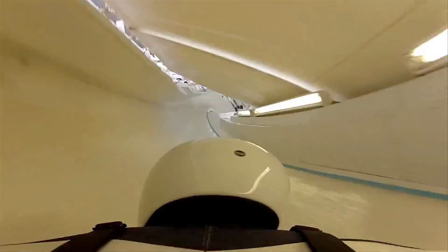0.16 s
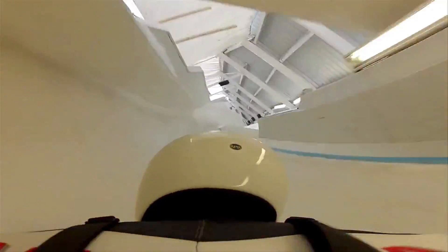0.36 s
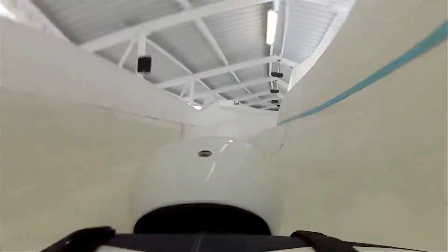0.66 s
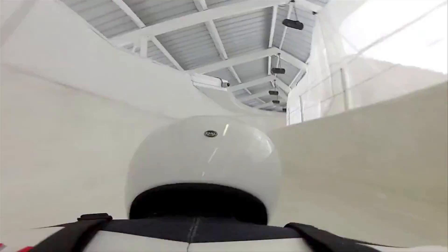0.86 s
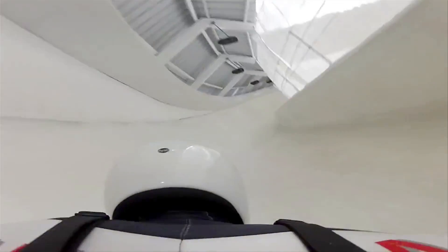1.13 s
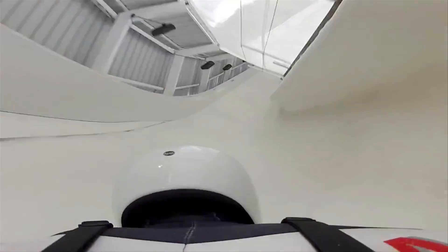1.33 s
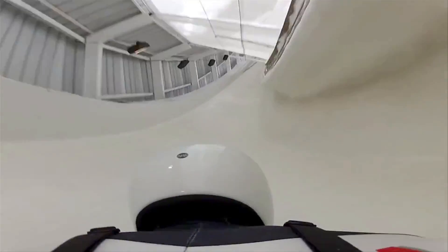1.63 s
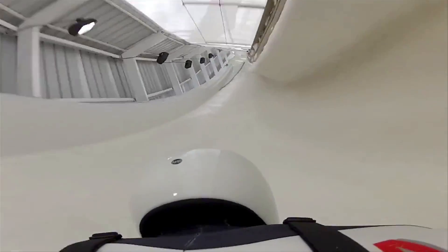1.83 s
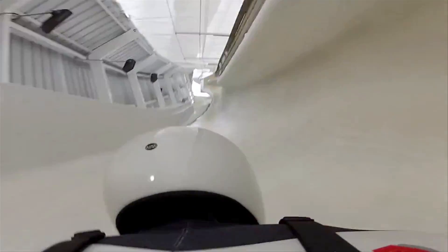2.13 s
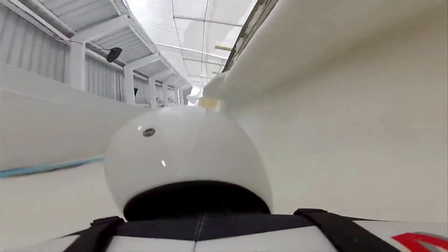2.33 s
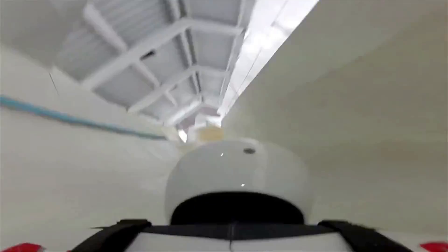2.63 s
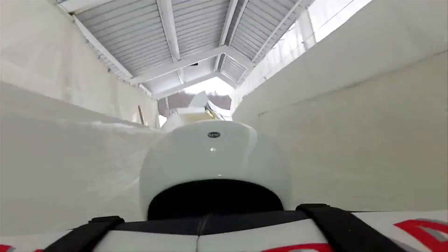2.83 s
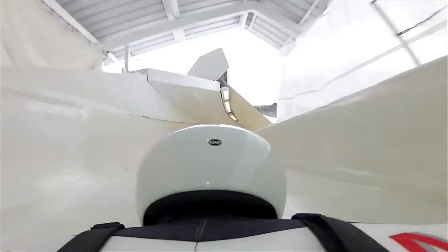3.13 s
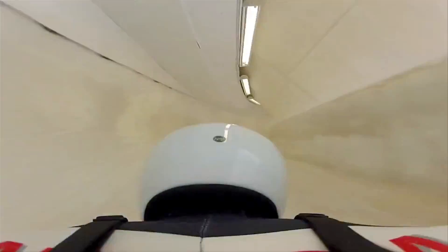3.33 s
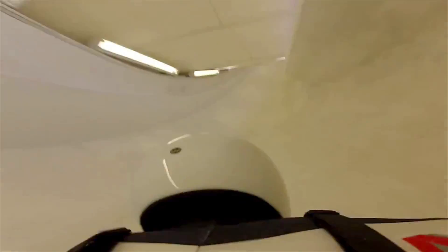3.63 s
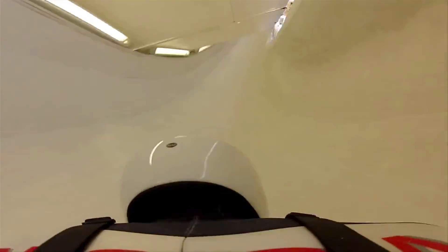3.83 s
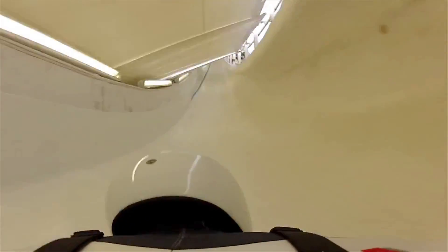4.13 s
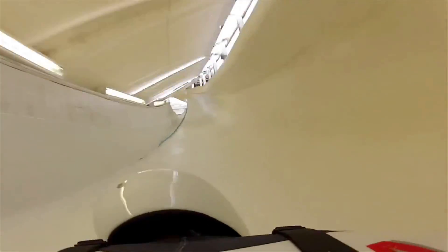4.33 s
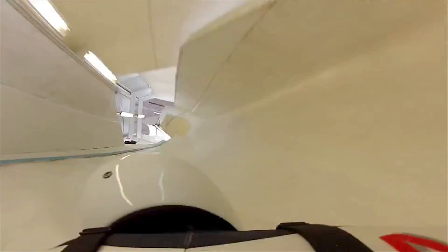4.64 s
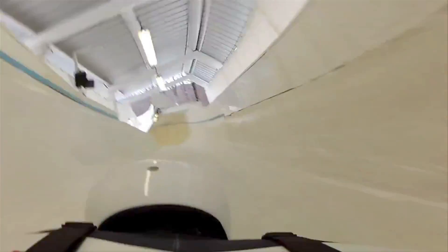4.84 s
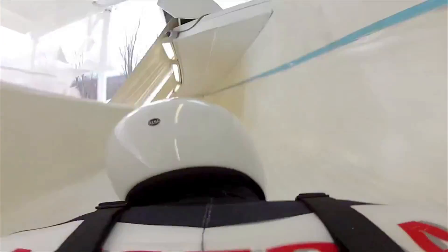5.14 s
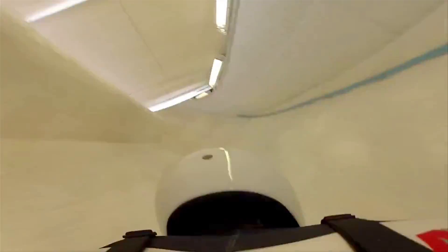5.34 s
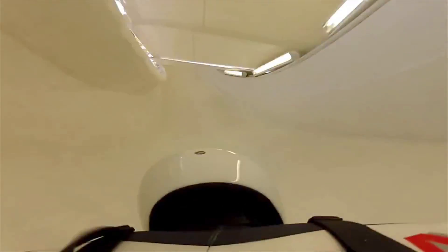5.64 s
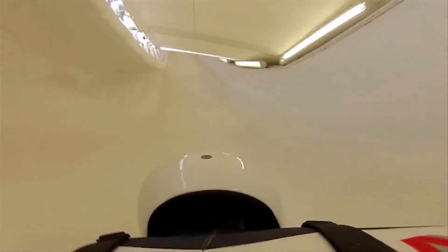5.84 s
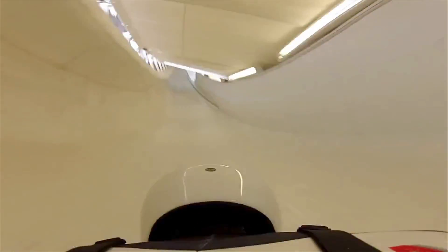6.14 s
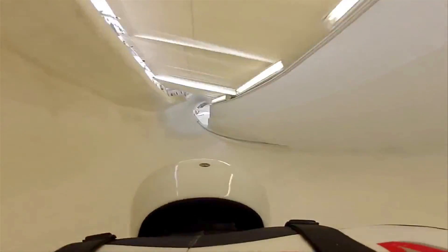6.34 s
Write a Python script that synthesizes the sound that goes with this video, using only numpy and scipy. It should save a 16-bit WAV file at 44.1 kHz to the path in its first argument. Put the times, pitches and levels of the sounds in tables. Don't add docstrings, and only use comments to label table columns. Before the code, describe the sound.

Continuous rough ice-scraping roar heard from a camera mounted on a speeding sled, with wind rumble, bumps and sharp clacks that briefly duck the sound.

```python
import sys
import numpy as np
from scipy import signal
from scipy.fft import rfft, irfft, next_fast_len
from scipy.io import wavfile
from scipy.ndimage import uniform_filter1d

SR = 44100
rng = np.random.default_rng(int(sys.argv[2]) if len(sys.argv) > 2 else 0)


def transcribe(signal):
    frames = np.atleast_2d(signal).T
    limited = np.clip(frames, -1, 1)
    pcm = np.round(limited * 32767).astype(np.int16)
    wavfile.write(sys.argv[1], SR, pcm)


def ratio_of_db(decibels):
    return 10 ** (np.asarray(decibels, float) / 20)


N = 286209


def rms_one(x):
    return x / np.sqrt(np.mean(x ** 2) + 1e-20)


def drift(rate_hz):
    r = np.exp(-2 * np.pi * rate_hz / SR)
    slow = signal.lfilter([1], [1, -2 * r, r * r], rng.standard_normal(N + SR))
    return rms_one(slow[SR:])


def evened(x, seconds):
    return x / np.sqrt(uniform_filter1d(x ** 2, int(seconds * SR)) + 1e-12)


def resonate(x, hz, width_hz):
    r = np.exp(-np.pi * width_hz / SR)
    poles = [1, -2 * r * np.cos(2 * np.pi * hz / SR), r * r]
    return signal.lfilter([(1 - r * r) / 2, 0, (r * r - 1) / 2], poles, x)


def body(x, modes, flicker_db, rate_hz):
    out = np.zeros(len(x))
    for k, (hz, width_hz, db) in enumerate(modes):
        gain = ratio_of_db(db + flicker_db * drift(rate_hz))
        out += (-1) ** k * gain * resonate(x, hz, width_hz)
    return out


# (frequency [Hz], width [Hz], level [dB])
FRAME_MODES = [
    (95.8, 26.3, -3),
    (125, 45.5, 2),
    (161.3, 80.3, -1),
    (211.4, 87, -7.5),
]


def frame_and_wind(drone_db, buffet_db):
    drone = evened(body(rng.standard_normal(N), FRAME_MODES, flicker_db=2.0, rate_hz=19.3), seconds=0.0415)
    eddies = signal.butter(2, [28, 95], "band", fs=SR, output="sos")
    buffet = evened(signal.sosfilt(eddies, rng.standard_normal(N)), seconds=0.053)
    rush = resonate(rng.standard_normal(N), 254, 140) * ratio_of_db(1.03 * drift(10.0))
    return ratio_of_db(drone_db) * drone + ratio_of_db(buffet_db) * buffet + ratio_of_db(-11.0) * rms_one(rush)


# (time of widest swing [s], peak level as heard [dB], frequency [Hz])
GUST_EVENTS = [(0.385, -12, 65.3), (0.505, -15, 59), (0.697, -14.5, 53), (0.18, -16, 44.5), (1.6, -13, 75),
               (2.083, -12, 63.4), (2.217, -17, 52), (2.322, -16, 52), (2.48, -12, 55), (2.697, -15, 60),
               (3.116, -13, 63), (3.467, -12.5, 62), (3.688, -14.5, 47), (3.946, -14, 50.4),
               (4.101, -16, 45), (4.526, -17, 52.3), (4.596, -17.5, 51.7), (4.765, -16, 55.3),
               (4.869, -15, 58), (5.004, -12, 58), (5.313, -9, 60.4), (5.524, -12, 49.5), (5.767, -15, 64),
               (5.929, -15, 45.8), (6.091, -14, 63), (6.163, -10, 49), (6.281, -15, 53)]
# (time of widest swing [s], peak level as heard [dB], frequency [Hz])
BUMP_EVENTS = [(0.379, -8.5, 149), (0.486, -5.5, 149), (1.564, -10.5, 125), (1.63, -7, 131),
               (4.58, -13.5, 121), (1.867, -12, 152), (2.104, -16, 136), (2.306, -14, 127),
               (2.355, -13.5, 120), (2.518, -9, 124), (2.703, -10, 107), (2.75, -7.5, 135),
               (2.938, -14.5, 142), (3.04, -10, 142), (3.074, -16, 135), (3.11, -11.5, 118),
               (3.224, -7.5, 139), (3.261, -11.5, 146), (3.288, -5.5, 127), (3.317, -11, 144),
               (3.452, -12.5, 141), (3.573, -13, 125), (4.044, -13, 140), (4.756, -10, 142),
               (4.869, -12, 133), (4.944, -12, 125), (5.002, -12.5, 159), (5.228, -12, 149),
               (5.32, -8.5, 136), (5.361, -9, 129)]


def swings(events, swing_cycles, drop_db):
    out = np.zeros(N + SR)
    half = SR // 20
    phases = rng.uniform(0, 2 * np.pi, len(events))
    for (s, db, hz), phase in zip(events, phases):
        cycles = np.arange(-half, half) / SR * hz
        spread = swing_cycles * ratio_of_db(0.37 * (db + 11))
        swing = np.exp(-(cycles / spread) ** 2) * np.sin(2 * np.pi * cycles + phase)
        at = round(s * SR)
        out[at - half:at + half] += ratio_of_db(db + drop_db[at]) * swing
    return out[:N]


# (frequency [Hz], level per Hz [dB])
TREBLE_SPECTRUM = [(2500, 1), (4000, -2), (4410, -5.5), (5440, -1), (6050, -15.5), (6600, -1.5), (7660, -9.5),
                   (8590, -0.5), (9050, -7.5), (9600, 4.5), (10500, -4), (11900, -17.5), (14400, 0.5),
                   (15500, -21)]


def shape_treble(x):
    hz, db = np.transpose(TREBLE_SPECTRUM)
    grid = np.linspace(0, SR / 2, 512)
    gain = ratio_of_db(np.interp(np.log(grid + 1), np.log(hz), db, left=-60, right=-80))
    return signal.oaconvolve(x, signal.firwin2(255, grid, gain, fs=SR), "same")


# (frequency [Hz], width [Hz], level [dB])
HOUSING_MODES = [
    (653, 95, -5.5),
    (1200, 190, 0.5),
    (1837, 467, 1),
    (2284, 404, 3),
    (2642, 203, -1.5),
    (3440, 210, -3),
]


def runners(tick_rate, tick_db, size_db, chatter_db, chip_rate, chip_db):
    chatter = ratio_of_db(chatter_db * (drift(40.0) + 0.63 * drift(12.0)))
    tick_sizes = ratio_of_db(tick_db + size_db * np.minimum(rng.exponential(1, N), 4))
    ticks = (rng.random(N) < tick_rate / SR) * tick_sizes
    burst = signal.lfilter([1], [1, -.97], ticks)
    drive = (chatter + burst) * rng.standard_normal(N)
    chip_hits = rng.random(N) < chip_rate * ratio_of_db(5 * drift(5.)) / SR
    chips = chip_hits * ratio_of_db(chip_db) * rng.standard_normal(N)
    taps = signal.lfilter([.5, .5], [1, -.3], chips)
    treble = shape_treble(drive)
    spray = signal.sosfilt(signal.butter(2, 7500, "high", fs=SR, output="sos"), treble)
    treble += (ratio_of_db(2.0 * drift(32.0) + 2.8 * drift(140.0)) - 1) * spray
    rattle = body(drive + taps, HOUSING_MODES, flicker_db=0.64, rate_hz=18.0)
    return rms_one(rattle) + ratio_of_db(-7.5) * rms_one(treble)


# (time [s], peak level as heard [dB], mode struck hardest [Hz], gain drop [dB])
JOLT_EVENTS = [(0.076, -6.5, 1830, 2), (0.383, -3.5, 1140, 1), (0.517, -9, 1890, 3.5),
               (0.564, -7.5, 1400, 4.5), (0.7, -6, 1700, 8), (0.77, -0.5, 1840, 16), (0.791, -14, 1270, 13),
               (0.977, -2, 1840, 7), (1.688, -11, 1220, 2.5), (1.883, -7, 2520, 3), (2.148, -4, 1280, 6),
               (2.709, 0.5, 1720, -3), (2.748, -3, 1800, 12.5), (3.127, -8.5, 2020, 4),
               (3.346, -6.5, 1180, 7), (3.508, -4, 1780, 9), (3.706, -1.5, 1270, 13.5),
               (4.289, -6, 2020, 1.5), (4.327, -5.5, 1800, 2.5), (4.675, -6.5, 1360, 4.5),
               (4.886, -9.5, 1190, 5.5), (4.947, -5.5, 1530, 8.5), (5.384, -6.5, 1820, 8.5),
               (5.518, -3, 1890, 8.5), (5.797, -1, 1840, 6), (5.82, -11, 1810, 6), (5.965, -8, 1790, 4),
               (6.188, -5.5, 1590, 9.5), (6.285, -6, 1930, 9), (6.45, -8, 2200, 6.5)]
# (time [s], peak level as heard [dB], mode struck hardest [Hz])
TAP_EVENTS = [(0.015, -12, 2130), (0.108, -8.5, 2250), (0.224, -11.5, 2120), (0.405, -14, 1900),
              (0.614, -4, 1920), (0.639, -14, 1930), (0.81, -18, 1170), (1.261, -7.5, 1190),
              (2.266, -15, 1280), (2.348, -6.5, 1850), (2.423, -6, 1740), (2.471, -13.5, 1170),
              (2.503, -11, 1880), (2.577, -11, 1890), (5.668, -11, 1800), (2.895, -12, 1740),
              (3.251, -9.5, 1260), (3.558, -9, 1200), (3.686, -17, 2350), (3.763, -11, 1290),
              (4.047, -7.5, 2170), (4.435, -10, 2660), (4.6, -5.5, 1130), (4.987, -10.5, 2100),
              (5.447, -10, 1240), (5.593, -7.5, 1310), (5.917, -9, 2300), (6.008, -13, 1950),
              (6.084, -8.5, 1910), (6.12, -10, 1280)]
# (time [s], peak level as heard [dB])
THUD_EVENTS = [(0.076, -13), (0.384, -25), (0.622, -14.5), (0.7, -26), (1.688, -20), (2.039, -11.5),
               (2.148, -15), (2.307, -13), (2.709, -16), (3.085, -12.5), (3.706, -15), (3.763, -18),
               (4.333, -16.5), (4.53, -17), (4.6, -16), (6.188, -12), (4.674, -15), (4.947, -17),
               (5.326, -14.5), (6.008, -19), (6.12, -14)]
# (time [s], peak level as heard [dB])
PING_EVENTS = [(0.108, -13), (0.224, -14), (0.384, -13), (0.977, -26), (1.261, -13), (1.688, -20),
               (1.884, -14), (2.423, -19), (2.471, -7), (2.577, -10.5), (3.346, -16), (3.686, -12),
               (4.327, -24), (5.518, -30), (5.593, -22), (6.45, -19)]


def knocks(drop_db):
    ring, rattle, crack = np.zeros((3, N))
    t = np.arange(SR // 50) / SR
    contact = (t / .002) ** 2 * np.exp(2 - 2 * t / 0.0017)
    thud = np.sin(2 * np.pi * 680 * t) * t / 0.0033 * np.exp(1 - t / 0.0025)
    ping = contact * (np.sin(2 * np.pi * 3697 * t) + ratio_of_db(-7.5) * np.sin(2 * np.pi * 8360 * t))
    blows = [row[:3] for row in JOLT_EVENTS + TAP_EVENTS]
    draws = rng.standard_normal((len(blows), len(t)))
    for (s, db, hz), draw in zip(blows, draws):
        start = round(s * SR)
        at = slice(start, start + len(t))
        size = ratio_of_db(db + drop_db[start + SR // 500])
        struck = 1.03 * contact * np.sin(2 * np.pi * hz * t)
        ring[at] += size * (struck + ratio_of_db(-22.5) * ping + ratio_of_db(-24) * thud)
        rattle[at] += 2.02 * size * contact * draw
        crack_db = -6.5 + 1 * np.log2(hz / HOUSING_MODES[2][0])
        crack[at] += size * contact * ratio_of_db(crack_db) * draw
    for events, shape in (THUD_EVENTS, thud), (PING_EVENTS, ping):
        for s, db in events:
            at = round(s * SR)
            ring[at:at + len(t)] += ratio_of_db(db + drop_db[at + SR // 500]) * shape
    dull = signal.butter(1, (300, 1800), "band", fs=SR, output="sos")
    punch = ratio_of_db(-11) * signal.sosfilt(dull, rattle)
    return ring + punch + body(rattle, HOUSING_MODES, flicker_db=-1.0, rate_hz=3) + shape_treble(crack)


def gain_drop_db():
    attack_s, release_s, start_drop_db = 0.0054, 0.16, 2
    t = np.arange(N) / SR
    drop = start_drop_db * np.exp(-t / release_s)
    for s, _, _, db in JOLT_EVENTS:
        since = t - s - .004
        drop = np.maximum(drop, db * np.exp(-np.abs(since) / release_s) * (since > 0))
    r = np.exp(-1 / (attack_s * SR))
    return signal.lfilter([1 - r], [1, -r], drop)


# (time [s], bite of the runners [dB], frame drone above the hiss [dB], wind buffet above the hiss [dB])
RIDE_COURSE = [(0.0, -2, -2.5, 1), (0.3, -3.5, 0.5, -0.5), (0.7, -1, 3, 5.5), (1.0, -0.5, 4.5, -1),
               (1.5, -1.6, -6, -4), (1.6, -2.2, 5.5, -1.5), (1.9, -0.3, 1, -2.5), (2.4, -1.5, 3.5, -4),
               (2.75, -2.5, 4, 4.5), (3.25, 1.5, 4, 3), (3.7, 0, 1.5, -3), (4.0, 0.5, -1, -2),
               (4.4, -1.7, -7.5, 2.5), (4.85, 0.5, -6, -3), (5.35, 0.5, 3.5, -1), (5.7, 0, 0, -2),
               (6.1, 0, -1, -1), (6.49, 2.5, -1, 3)]


def scene():
    s, *controls = np.transpose(RIDE_COURSE)
    bite_db, drone_db, buffet_db = (np.interp(np.arange(N) / SR, s, c) for c in controls)
    drop_db = gain_drop_db()
    ride = runners(tick_rate=41.0, tick_db=-3.5, size_db=4.0, chatter_db=0.0, chip_rate=150., chip_db=14.5)
    ride += ratio_of_db(-16 - 1.18 * drone_db) * resonate(ride, 2540, 430)
    skip_db = 0.16 * drop_db
    ride += frame_and_wind(drone_db - 2.5 - skip_db, buffet_db - 4.5 - skip_db)
    lows = swings(BUMP_EVENTS, 1.45, drop_db) + swings(GUST_EVENTS, 0.62, drop_db)
    return (ratio_of_db(-19.5 + bite_db) * ride + lows + knocks(drop_db))[None]


def limit(x):
    t = np.arange(N) / SR / 0.041
    over = np.maximum(20 * np.log10(np.abs(x) + 1e-9) + 4.5, 1e-3)
    drop = np.exp(np.maximum.accumulate(np.log(over) + t) - t)
    r = np.exp(-1 / (0.0047 * SR))
    return x * ratio_of_db(-signal.lfilter([1 - r], [1, -r], drop))


# (lower edge [Hz], upper edge [Hz], share of time kept [0-1])
WEAK_STRIPS = [(5800, 5900, .7), (5900, 6150, .04), (6150, 6260, .6), (10850, 11050, .7),
               (11050, 11220, .08), (11220, 11420, .3), (11420, 11780, .04), (11780, 11950, .45),
               (11950, 12060, .06), (12060, 12250, .55), (12250, 12550, .12), (12550, 12780, .45),
               (12780, 13000, .07), (13000, 13300, .85), (14750, 14950, .7), (14950, 15350, .04),
               (15350, 15800, .01)]


def starve(x):
    size = next_fast_len(N)
    spectrum, hz = rfft(x, size), np.fft.rfftfreq(size, 1 / SR)
    overload = np.zeros(N, bool)
    for s, _, _, db in JOLT_EVENTS:
        overload[round((s - .002) * SR):round((s + .007) * SR)] = db > 7.5
    out = irfft(spectrum * (hz < WEAK_STRIPS[-1][1]), size)[:N]
    chances = rng.random((len(WEAK_STRIPS), N // 1536 + 1))
    mood = ratio_of_db(3 * drift(1.5) - 1.5)
    for (low, high, share), chance in zip(WEAK_STRIPS, chances):
        kept = (np.repeat(chance, 1536)[:N] < share * mood) | overload
        gate = uniform_filter1d(uniform_filter1d(kept * 1., size=300), size=300)
        strip = irfft(spectrum * (hz >= low) * (hz < high), size)[:N]
        out -= (1 - gate) * strip
    return out


def low_pass(x):
    return signal.sosfilt(signal.butter(12, 15760, fs=SR, output="sos"), x)


def record(dry):
    x = limit(dry[0] * ratio_of_db(-gain_drop_db()))
    x = 0.77 * np.tanh(x / 0.73)
    mix = starve(x)[None]
    return low_pass(mix)


dry = scene()
out = record(dry)
transcribe(out)
```